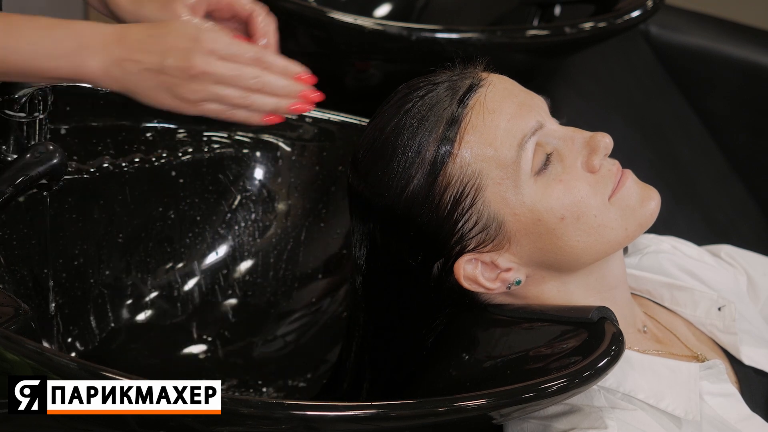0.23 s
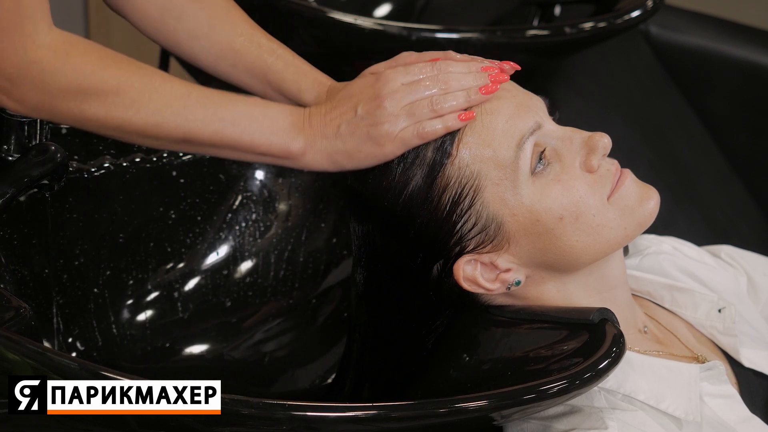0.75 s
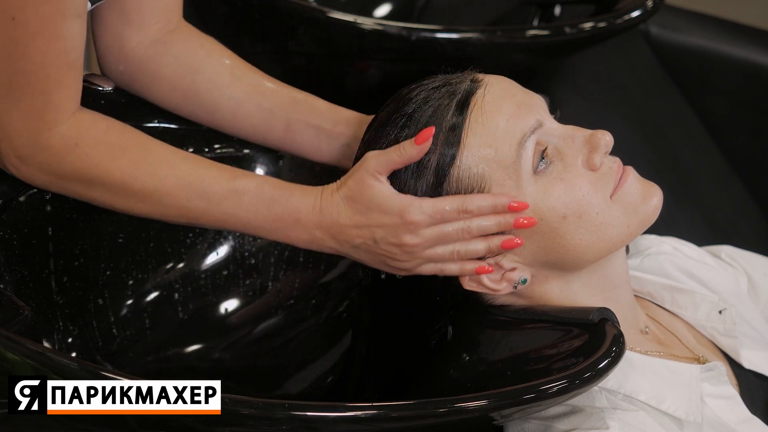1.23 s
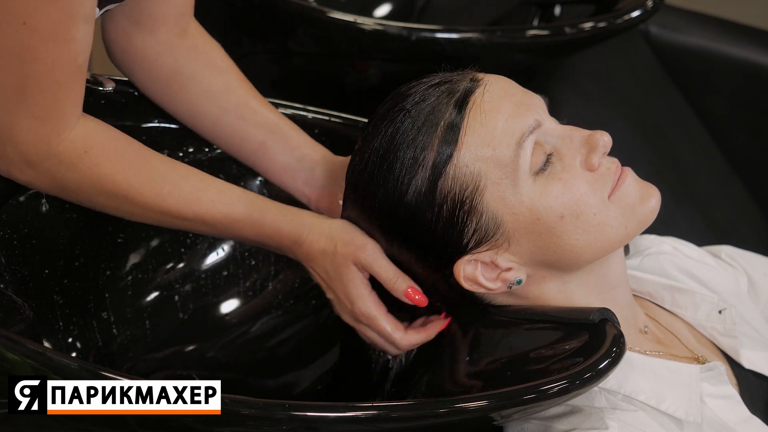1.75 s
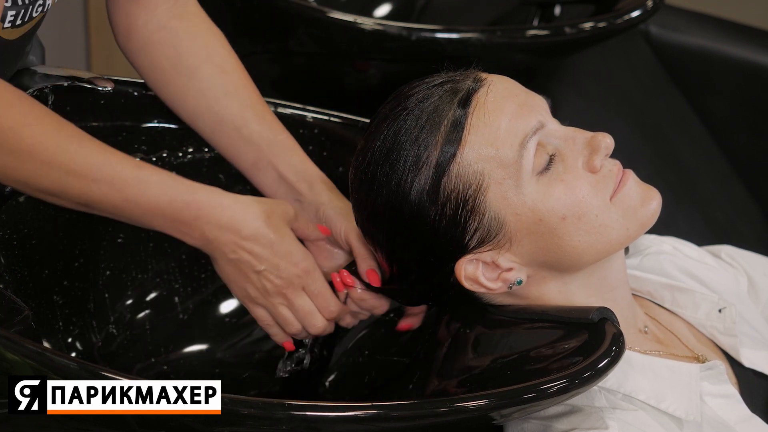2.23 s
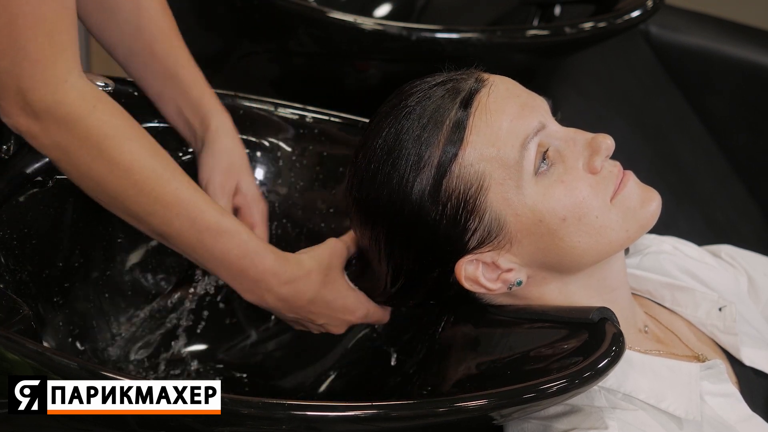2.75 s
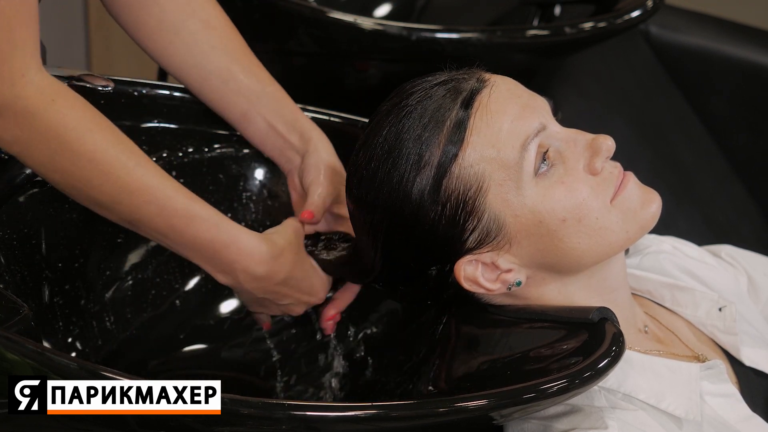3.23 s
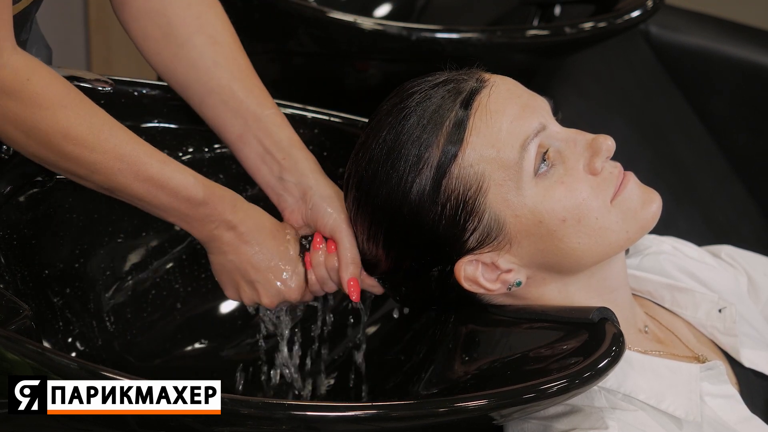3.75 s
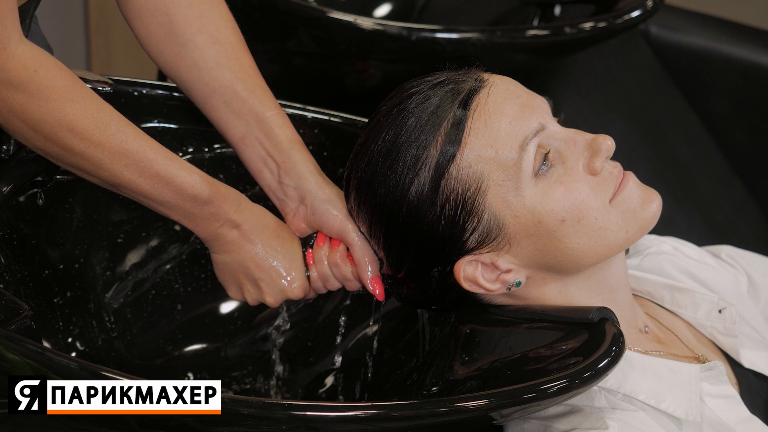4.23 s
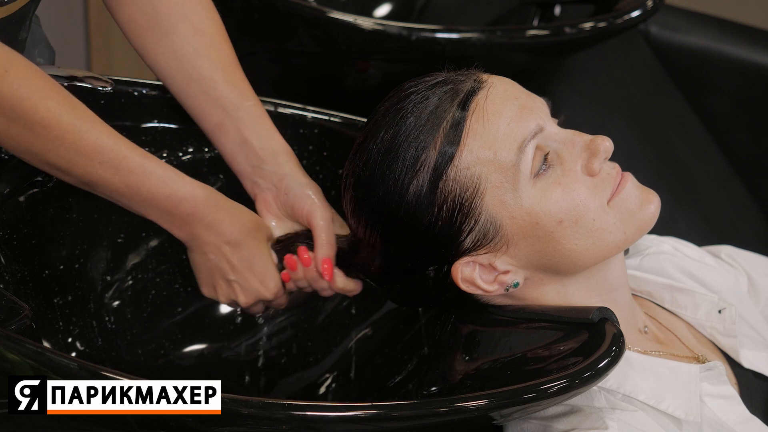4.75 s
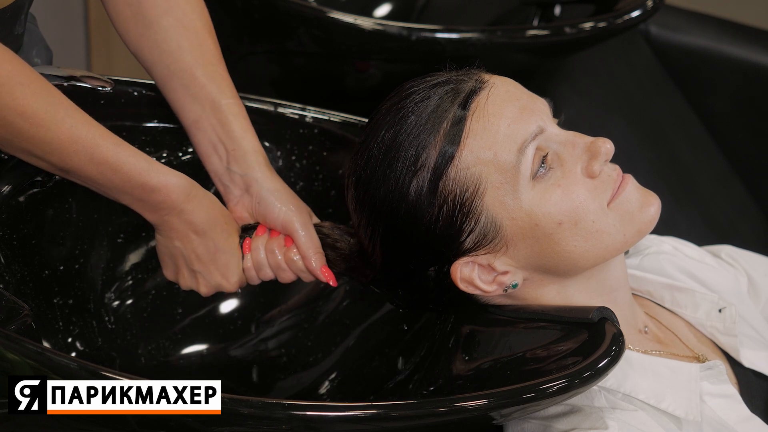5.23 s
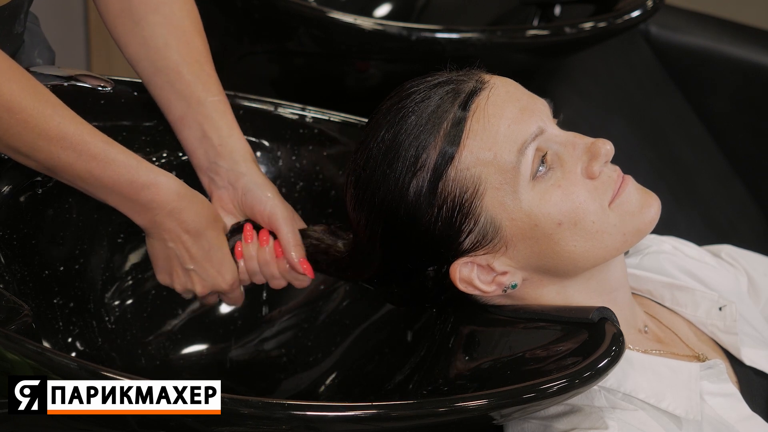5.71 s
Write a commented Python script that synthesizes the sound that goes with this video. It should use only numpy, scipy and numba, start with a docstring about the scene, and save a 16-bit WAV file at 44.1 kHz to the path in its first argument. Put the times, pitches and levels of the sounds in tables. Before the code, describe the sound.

Close-up water splashes fade fast to sparse drips, then hollow drain gurgles and bright droplets come in bursts as hands squeeze wet hair.

```python
"""At a ceramic basin, hands smooth and wring wet hair just after the sprayer is shut off.
The last spray drains away as fizzing, sloshing noise; drops crackle on the glaze as short gliding tones
with puffs of noise. Slugs of water glug in the drain pipe as dying low tones, drips ring the drain cup
and a trickle murmurs as resonant noise. Fingers rustle on the hair; a quiet room hums behind it all.
One close microphone hears it."""
import sys
import numpy as np
from scipy import signal
from scipy.fft import rfft, irfft, next_fast_len
from scipy.io import wavfile
from scipy.ndimage import uniform_filter1d
from numba import njit

SR = 44100
rng = np.random.default_rng(int(sys.argv[2]) if len(sys.argv) > 2 else 0)


def magnitude_from_level(level_db):
    """Linear magnitude for a level in decibels (20 dB per decade)."""
    exponent = np.asarray(level_db, float) / 20
    return 10 ** exponent


def put_to_file(sound):
    """Save the sound as 16-bit audio at rate SR, in the file named by the first command-line argument."""
    columns = np.atleast_2d(sound).T  # one column per channel
    safe = np.clip(columns, -1, 1)
    whole_steps = np.round(safe * 32767)
    wavfile.write(sys.argv[1], SR, whole_steps.astype(np.int16))


N = 263715  # length in samples, about 6 s

# Water running off hair and hands.
# Each row: time in seconds, fizz level in dB, level of the small drops in dB.
RUNNING_WATER = [(0.0, -38, -54), (0.18, -44.5, -45), (0.3, -59.5, -56), (0.61, -52, -59.5),
                 (0.77, -54, -59.5), (0.87, -61, -71), (1.27, -57, -61), (1.75, -60, -61.5),
                 (1.88, -52, -58), (2.18, -58, -67), (2.48, -54, -57), (2.8, -60.5, -57),
                 (2.98, -57, -52.5), (3.12, -61.5, -59), (3.25, -58.5, -61.5), (3.75, -62, -59),
                 (4.13, -66, -48.5), (4.3, -61.5, -54), (4.6, -69, -69.5), (4.81, -56, -53),
                 (5.06, -63.5, -69), (5.55, -67.5, -78), (5.98, -65, -68)]
# Slugs of water landing in the drain.
# Each row: start in seconds, level in dB, pitch of the air column in Hz before its glide,
# overtone level in dB against the column, time in seconds for the column to die by 60 dB.
SLUGS = [(1.263, -32.5, 235, -12, 0.025), (1.488, -35.5, 316, -8, 0.038), (1.523, -38, 363, -20, 0.041),
         (1.69, -40, 462, -17, 0.074), (1.922, -27, 383, -2, 0.014), (1.958, -29.5, 376, -5, 0.02),
         (2.025, -35, 352, -10, 0.027), (2.173, -34, 323, -1, 0.039), (2.283, -31.5, 278, -17, 0.024),
         (2.36, -26, 320, 0.5, 0.015), (2.38, -23.5, 305, -3, 0.032), (2.397, -16, 330, -22, 0.024),
         (2.423, -21.5, 328, -5, 0.044), (2.441, -14, 260, -17, 0.018), (2.454, -28, 318, -5, 0.026),
         (2.471, -34.5, 337, -5, 0.066), (2.534, -28, 326, -8, 0.038), (2.573, -37, 342, -12, 0.035),
         (2.672, -17, 287, -3, 0.028), (2.685, -7.5, 280.6, -15, 0.027), (2.698, -13, 268, -11, 0.02),
         (2.714, -22, 246, -10, 0.033), (2.78, -36.5, 256, -22, 0.069), (2.875, -23, 240, -8, 0.035),
         (2.893, -21.5, 253, -14, 0.047), (2.914, -14, 275.6, -13.5, 0.049), (2.942, -23, 259, -13, 0.022),
         (3.017, -33.5, 240, -16, 0.052), (3.053, -34, 226, -16, 0.03), (3.164, -35, 243, 2, 0.057),
         (3.201, -20, 239, -17, 0.04), (3.359, -30, 250, -24, 0.023), (3.547, -24.5, 280, -9.5, 0.02),
         (3.758, -23, 257, -4, 0.04), (3.781, -19.5, 300, -20, 0.019), (3.795, -25, 250, -3, 0.032),
         (3.807, -15, 228, -15, 0.038), (3.825, -16, 240, -16, 0.04), (3.846, -22, 256, -20, 0.098),
         (3.865, -21.5, 235, -13, 0.062), (3.905, -16.5, 250, -7.5, 0.022), (3.925, -21, 264, -4.5, 0.032),
         (3.939, -32, 243, -19, 0.036), (3.965, -22, 273.5, -18, 0.057), (4.045, -32, 250, -9, 0.036),
         (4.06, -23.5, 282, -6, 0.036), (4.091, -19.5, 245, -8, 0.015), (4.105, -4.5, 269, -7, 0.021),
         (4.127, -27, 270, -18, 0.02), (4.158, -30.5, 236, -3.5, 0.065), (4.201, -23.5, 283, -4.5, 0.045),
         (4.239, -18, 220, -6, 0.021), (4.249, -25, 225, -12, 0.046), (4.316, -25.5, 255, -0.5, 0.037),
         (4.361, -27.5, 228, -15, 0.051), (4.402, -37.5, 270, 1, 0.038), (4.426, -22.5, 293, -19, 0.016),
         (4.444, -35.5, 250, -5, 0.063), (4.754, -35.5, 293, -14, 0.025), (4.865, -32, 317, -9, 0.074)]
CUP_HZ = 1380  # pitch around which the drain cup rings


def level(x, db):
    """Scale a sound to an rms level in dB."""
    return x * magnitude_from_level(db) / np.sqrt(np.mean(x ** 2))


def curves(table):
    """Turn a table's columns into smooth curves over time, joined by straight lines."""
    s, *columns = np.transpose(table)
    return [np.interp(np.arange(N) / SR, s, column) for column in columns]


def colour(x, points):
    """Shape the spectrum by (Hz, dB) points joined on a logarithmic pitch axis."""
    hz, db = np.transpose(points)
    size = next_fast_len(len(x))
    f = np.maximum(np.arange(size // 2 + 1) * SR / size, 1)
    gain = magnitude_from_level(np.interp(np.log(f), np.log(hz), db))
    return irfft(rfft(x, size) * gain, size)[:len(x)]


def resonate(x, hz, width_hz):
    """Ring one resonance, with gain 1 at its centre."""
    return signal.lfilter(*signal.iirpeak(hz, hz / width_hz, fs=SR), x)


def walk(rate):
    """Wander randomly: levels held for 1 / rate seconds, then smoothed twice; spread near 1."""
    hold = int(SR / rate)
    steps = np.repeat(rng.standard_normal(N // hold + 1), hold)
    return 1.3 * uniform_filter1d(uniform_filter1d(steps, hold), hold)[:N]


@njit
def rings(count, start, size, hz, t60, glide, hook, rise, hold):
    """Add dying tones with a soft onset; the hook bends the pitch at once, the glide over t60.
    A hold of 1 decays evenly, 2 rings on and then stops quickly."""
    out = np.zeros(count)
    for k in range(len(start)):
        first = max(int((start[k] - rise) * SR), 0)
        phase = 0.
        for i in range(min(int(t60[k] * SR), count - first)):
            u = i / (t60[k] * SR)
            late = np.exp(-i / (rise * SR))
            pitch = min(hz[k] * (1 + glide * u + hook * late), .45 * SR)
            phase += 2 * np.pi * pitch / SR
            out[first + i] += size[k] * (1 - late) ** 2 * 1000. ** -(u ** hold) * np.sin(phase)
    return out


def bursts(s, size, t60_s, rise_s):
    """Make puffs of noise that swell briefly, then die by 60 dB in t60_s."""
    spikes = np.zeros(N)
    np.add.at(spikes, (s * SR).astype(int), size)
    fall = signal.lfilter([1], [1, -1000. ** (-1 / (t60_s * SR))], spikes)
    soft = np.exp(-1 / (rise_s * SR))
    return signal.lfilter([1 - soft], [1, -soft], fall) * rng.standard_normal(N)


def fizz(fizz_db):
    """Fine fizz of running water: noise bands that flicker partly together, partly each alone."""
    # Each row: frequency in Hz, gain in dB.
    fizz_shape = [(1200, -28), (2000, 3), (2600, 4.5), (3800, 4.5), (5500, 6), (7500, 5.5), (11000, 6),
                  (16000, 3.5)]
    shared = 1.5 * walk(25)
    bands = 0
    for hz in (2500., 4000., 6400., 10000., 15000.):
        flicker = magnitude_from_level(shared + 2 * walk(40))
        bands = bands + flicker * resonate(rng.standard_normal(N), hz, hz / 2)
    return magnitude_from_level(fizz_db) * level(colour(bands, fizz_shape), 0)


def slosh():
    """Duller wash of water: the last spray sags and stops, then the film on the glaze thins slowly."""
    # Each row: frequency in Hz, gain in dB.
    slosh_shape = [(150, 4), (300, 9.5), (600, 7), (1000, 5.5), (1800, 6), (2200, 2), (2650, 2.5),
                   (3200, 0), (4500, -5.5)]
    spray_start_db, spray_sag_db_per_s = -38.5, 47.5
    spray_stops_s, spray_stop_db_per_s = 0.2, 90
    film_start_db, film_fall_db_per_s = -56.5, 3
    now = np.arange(N) / SR
    after_stop = np.maximum(now - spray_stops_s, 0)
    spray_db = spray_start_db - spray_sag_db_per_s * now - spray_stop_db_per_s * after_stop
    slosh_db = np.maximum(spray_db, film_start_db - film_fall_db_per_s * now)
    noise = colour(rng.standard_normal(N), slosh_shape + [(8000, -56)])
    return magnitude_from_level(slosh_db) * level(magnitude_from_level(0.55 * walk(29.8)) * noise, 0)


def patter(small_db):
    """Shower of small, mostly faint drops: each a rising bubble tone and a click near its own pitch."""
    chance = rng.random((3000, 4))
    s = chance[:, 0] * (N - 1) / SR
    size = magnitude_from_level(np.minimum(-4 * np.log(chance[:, 1]), 17))
    hz = 2200 + 12800 * chance[:, 2]
    size = size * hz / hz.max()  # the low ones are fainter
    bubble = rings(N, s, size, hz, (15 + 60 * chance[:, 3]) / hz, 0.35, 0., .0002, 0.74)
    click = rings(N, s, size, 1.37 * hz, 9 / hz, -0.12, 0., .0001, 0.8)
    return magnitude_from_level(small_db) * level(bubble + click, 0)


def murmur():
    """Trickle in the drain: many small puffs of noise stir the pipe's resonances and the cup."""
    # Each row: time in seconds, murmur level in dB before it wavers.
    murmur_table = [(0.0, -43.5), (0.27, -58), (0.8, -57.5), (1.2, -62.5), (1.63, -54), (1.91, -48),
                    (2.21, -52), (2.46, -39), (2.55, -47.5), (2.68, -45), (3.0, -51), (3.76, -53.5),
                    (3.85, -55), (3.98, -58), (4.14, -50.5), (4.58, -55), (4.83, -45.5), (5.06, -55),
                    (5.6, -67), (5.98, -54.5)]
    # Resonances of the drain. Each row: pitch in Hz, width in Hz, gain in dB.
    pipe_resonances = [(250, 38, 6.5), (337.5, 32, 4.5), (400, 81, -3.5), (490, 240, -7), (600, 33, -7.5)]
    cup_width_hz, cup_under_pipe_db = 100, -20
    murmur_db = curves(murmur_table)[0] + 1.3 * walk(13)
    sizes = 1 + rng.exponential(size=1800)
    trickle = bursts(rng.random(1800) * (N - 1) / SR, sizes, .03, .003)
    pipe = 0
    for hz, width, db in pipe_resonances:
        pipe = pipe + magnitude_from_level(db) * resonate(resonate(trickle, hz, 2 * width), hz, width)
    steady = 0.43 * np.std(trickle) * rng.standard_normal(N)
    cup = resonate(resonate(trickle + steady, CUP_HZ, 2 * cup_width_hz), CUP_HZ, cup_width_hz)
    return magnitude_from_level(murmur_db) * (level(pipe, 0) + level(cup, cup_under_pipe_db))


def room():
    """Quiet room: shaped air noise, wavering motor hum made of narrow noise, and a thin whine."""
    # Air noise. Each row: frequency in Hz, gain in dB.
    air_shape = [(12, -46), (20, 3.5), (60, -11.5), (146, -2), (222, -2.5), (293, -19), (485, -11),
                 (624, -18.5), (678, -20.5), (780, -22), (1610, -35), (11800, -74), (16000, -50)]
    # Motor hum. Each row: pitch in Hz, rms level in dB, width in Hz.
    hum_lines = [(67.8, -73, 4.7), (146.4, -65.5, 2.7), (206.3, -60, 2.8), (244, -66.5, 2.4),
                 (472.4, -66.5, 3.6)]
    air_db, whine_hz, whine_db = -53, 686, -65
    air = level(colour(rng.standard_normal(N), air_shape), air_db)
    hum = 0
    for hz, db, width in hum_lines:
        hum = hum + level(resonate(rng.standard_normal(N), hz, width), db)
    # the whine wavers in loudness and a little in pitch
    whine_phase = 2 * np.pi * np.cumsum(whine_hz + 1.365 * walk(8)) / SR
    whine = magnitude_from_level(2.3 * walk(2.18)) * np.sin(whine_phase)
    return air + hum + level(whine, whine_db)


def rumble():
    """Low rumble of shaped noise that comes and goes, likely arms and neck leaning on the basin."""
    # Each row: time in seconds, rumble level in dB before it wavers.
    rumble_table = [(0.0, -45.5), (0.27, -56.5), (2.2, -59.5), (2.55, -56.5), (3.14, -65), (3.25, -42),
                    (3.46, -51), (3.6, -47), (3.68, -58), (3.78, -46.5), (4.2, -57), (4.58, -53.5),
                    (4.83, -48.5), (5.06, -60), (5.35, -50.5), (5.56, -59), (5.67, -47.5), (5.8, -52),
                    (5.98, -45.5)]
    rumble_db = curves(rumble_table)[0] + 1.6 * walk(8)
    shape = [(15, -41), (33, -14), (60, 6), (110, -0.5), (170, -1.0), (400, -70)]
    return magnitude_from_level(rumble_db) * level(colour(rng.standard_normal(N), shape), 0)


def splashes(s, hz, splash_db):
    """Splash noise in bands, strongest near the bubble's pitch and fading away from it."""
    # Centres of the noise bands in Hz.
    splash_bands = (2500., 4000., 6400., 10000., 14500.)
    up_db_per_octave, down_db_per_octave = 6.5, 12.5
    splash = 0
    for band in splash_bands:
        octaves = np.log2(band / hz)
        fade_db = np.maximum(up_db_per_octave * octaves, -down_db_per_octave * octaves)
        puffs = bursts(s - .0005, magnitude_from_level(splash_db - fade_db), 0.01, 0.00083)
        splash = splash + resonate(resonate(puffs, band, 0.76 * band), band, 0.76 * band)
    return colour(splash, [(1200, 2.0), (2500, -5.5), (6000, -7), (15000, -5.0)])


def drops():
    """Drops on the glaze, some with two bubbles at once: bubbles rising in pitch, with splashes."""
    # Each row is one bubble: start in seconds, bubble level in dB, bubble pitch in Hz before it rises,
    # splash level in dB against the bubble.
    bubble_table = [(0.0078, -12, 6100, 1.5), (0.0225, -27, 2670, -3), (0.0367, -24, 5660, 2),
                    (0.0427, -19, 5800, 4.5), (0.053, -17, 13400, 3), (0.0826, -21.5, 5550, -13),
                    (0.0984, -10.5, 11100, -11), (0.1095, -25.5, 2500, -6), (0.138, -19, 10700, -4),
                    (0.152, -23, 9800, -5), (0.1732, -30.5, 2410, -5), (0.175, -24, 9130, -16),
                    (0.19, -23, 10850, -2), (0.1906, -27, 3930, -4), (0.2453, -34, 7560, -2),
                    (0.2852, -28, 12500, 1), (0.2866, -28, 4840, 0.5), (0.335, -28, 11000, 1),
                    (0.336, -27.5, 4140, 3), (0.347, -24, 12750, -5), (0.362, -25, 8750, -7),
                    (0.371, -19, 10500, -8), (0.489, -37, 6250, -4), (0.519, -37, 4550, 5.5),
                    (0.5364, -40, 2440, -2), (0.6458, -16, 14000, -5), (0.6457, -27, 5260, 2.5),
                    (0.9313, -40.5, 3170, -8), (1.364, -34, 4500, -9), (1.3951, -26, 6140, -17),
                    (1.4166, -35, 5000, 4), (1.451, -33.5, 4730, 1), (1.5037, -30.5, 9100, -4),
                    (1.529, -30, 9550, -5), (1.693, -26, 11600, -18), (1.7437, -21, 12000, -14),
                    (1.777, -26, 12100, -0.5), (1.8255, -25.5, 12200, -2), (1.909, -33, 5470, 8),
                    (1.946, -34, 6800, 5), (2.145, -24, 5000, -3.5), (2.17, -37, 4280, -4),
                    (2.2795, -37.5, 5080, 6), (2.3285, -30, 6300, -17), (2.3686, -35, 10510, 3),
                    (2.4413, -22, 5700, -1), (2.442, -24, 13780, 0), (2.5354, -26.5, 9200, -8),
                    (2.6236, -28.5, 12100, 4), (2.7112, -28, 9350, -11), (2.7567, -32, 4160, -10),
                    (2.7674, -37, 5600, 1), (2.8153, -28.5, 10500, 5), (2.893, -9.5, 10000, -20),
                    (2.8932, -21, 7050, -2.5), (2.9193, -20, 12000, -4), (2.9448, -26.5, 14400, 3.5),
                    (2.963, -24, 11710, -9), (2.987, -30, 7240, -1), (3.0126, -27.5, 4850, 0.5),
                    (3.02, -20, 10900, -6), (3.0491, -23, 5170, -7), (3.083, -31, 5680, -4),
                    (3.0958, -34.5, 8200, 2), (3.174, -17, 5600, -10.5), (3.1861, -28, 11400, 3),
                    (3.2403, -25, 11200, -5), (3.2447, -25.5, 5070, -2.5), (3.286, -35, 5300, -2),
                    (3.366, -31, 5570, -3), (3.4268, -31, 6140, -2), (3.4687, -33, 7800, 4),
                    (3.4821, -26, 4540, -2), (3.618, -28, 7300, -17), (3.6382, -32, 11200, 5),
                    (3.647, -17, 5770, -15), (3.6463, -22, 9470, -5), (3.68, -28, 10300, -7),
                    (3.681, -28, 3730, 5), (3.715, -32, 3940, -15), (3.727, -21.5, 7700, -21),
                    (3.759, -26, 9650, -7), (3.775, -26.5, 10400, 7.5), (3.799, -31, 9900, 2),
                    (3.8175, -21, 12000, -1), (3.8472, -28.5, 13950, 0.5), (3.8858, -36.5, 4500, 6.5),
                    (3.9076, -22.5, 9730, -3), (3.9205, -31.5, 6030, 0.5), (3.9437, -27, 13600, 3),
                    (3.9594, -23, 4820, -17), (3.959, -22, 8160, 2.5), (3.9833, -22, 8240, -5),
                    (4.005, -23, 7600, -8), (4.0214, -22, 8900, 5.5), (4.0232, -15, 4960, -23),
                    (4.041, -15, 11000, -7), (4.0536, -37, 3240, -9), (4.066, -23, 7700, -11),
                    (4.0711, -33, 4030, -5), (4.0825, -29, 4020, -6), (4.0935, -15, 12300, -7),
                    (4.102, -22, 7650, -7), (4.1275, -28.5, 3000, -17), (4.133, -15.5, 9300, -7.5),
                    (4.144, -17.5, 5500, -1.5), (4.144, -22.5, 9300, -3), (4.1667, -18, 5100, -22),
                    (4.1664, -18.5, 9800, 0.5), (4.208, -23.5, 8350, 6), (4.2274, -37.5, 4150, 3),
                    (4.241, -23, 7500, 3.5), (4.256, -27, 6660, 4), (4.267, -26, 8900, 3),
                    (4.2873, -30, 8610, -3), (4.31, -27, 4600, -4), (4.319, -28.5, 8800, 5),
                    (4.3654, -36, 11400, -3), (4.4004, -27.5, 12600, -3), (4.426, -39.5, 6300, 4.5),
                    (4.4741, -30, 12750, -1), (4.4928, -29.5, 13300, 0), (4.532, -27, 11400, -9),
                    (4.556, -22, 10860, -5.5), (4.5847, -35, 7000, -1), (4.6143, -24, 11200, -8),
                    (4.7828, -28.5, 6460, 1.5), (4.8433, -30, 8950, -4), (4.968, -18, 8000, -3),
                    (4.9895, -33, 3530, -10), (5.3681, -37, 9600, 6.5), (5.3882, -31, 12300, 0)]
    s, db, hz, splash_db = np.transpose(bubble_table)
    bubble = rings(N, s, magnitude_from_level(db), hz, 45 / hz + 0.0025, 0.31, 0., .0002, 0.64)
    # three more bubbles for each row, from 2 ms before its start to 5 ms after
    chance = rng.random((len(s), 3, 3))
    more_s = (s[:, None] + 0.007 * chance[..., 0] - .002).ravel()
    more_hz = (hz[:, None] * 2.0 ** (1.555 * chance[..., 1] - .35)).ravel()
    more_size = magnitude_from_level((db + splash_db)[:, None] - 4.3 * chance[..., 2]).ravel()
    spray = rings(N, more_s, more_size, more_hz, 40 / more_hz, 0.99, 0., .00015, 0.8)
    return bubble + spray + splashes(s, hz, db + splash_db)


def cup_rings():
    """Drips and landing slugs ring the drain cup: dying tones that sink, each begun by a short tap."""
    # Drips. Each row: start in seconds, level in dB, pitch in Hz before its glide,
    # time in seconds to die by 60 dB.
    drip_table = [(0.297, -40.5, 2290, 0.016), (0.368, -35.5, 1630, 0.025), (0.371, -33, 2730, 0.014),
                  (0.4179, -37.5, 2110, 0.016), (0.487, -35.5, 1680, 0.014), (0.762, -40, 1880, 0.018),
                  (1.416, -41, 1100, 0.028), (1.432, -36, 1430, 0.016), (1.4486, -35, 1360, 0.013),
                  (1.4773, -39, 1700, 0.019), (1.5815, -42.5, 1430, 0.019), (2.17, -48.5, 1480, 0.05),
                  (2.475, -42.5, 1430, 0.074), (2.8474, -42.5, 1990, 0.019), (2.9144, -40.5, 1360, 0.069),
                  (3.254, -39, 2070, 0.019), (3.3325, -48.5, 1374, 0.08), (3.55, -48, 1640, 0.03),
                  (3.572, -50, 1370, 0.031), (3.6501, -43, 1320, 0.018), (3.775, -41, 2060, 0.014),
                  (3.8723, -43.5, 1430, 0.033), (3.914, -50, 1386, 0.045), (4.0595, -41.5, 1240, 0.013),
                  (4.1121, -41, 1447, 0.056), (4.235, -53, 1420, 0.06), (4.262, -50, 2250, 0.025),
                  (4.5416, -33.5, 1373, 0.051)]
    kick_db, kick_t60_s = -34, 0.039  # the cup's ring from a slug, against the slug's level
    s, db = np.transpose(SLUGS)[:2]
    kick_hz = CUP_HZ * (1.03 + .03 * rng.standard_normal(len(s)))
    kicks = np.c_[s, db + kick_db, kick_hz, np.full(len(s), kick_t60_s)]
    s, db, hz, t60 = np.r_[drip_table, kicks].T.copy()
    ring = rings(N, s, magnitude_from_level(db), hz, t60, -.08, .14, .001, 1.3)
    tap = rings(N, s, magnitude_from_level(db - 4), 1.08 * hz, 7 / hz, -.3, .3, 0.00019, 0.95)
    return ring + tap


def glugs():
    """Slugs of water ring the pipe's air column and its overtone, the pitch dropping as they land."""
    s, db, hz, over_db, t60 = np.transpose(SLUGS)
    sign = np.sign(rng.standard_normal(len(s)))  # the first push goes either way
    column = rings(N, s, sign * magnitude_from_level(db), hz, t60, -0.17, 0.64, 0.0019, 1.7)
    over_size = sign * magnitude_from_level(db + over_db)
    overtone = rings(N, s, over_size, 1.985 * hz, 0.49 * t60, -0.0083, 0.05, 0.0013, 1.83)
    return column + overtone


def strokes():
    """Fingers sliding on wet hair: short grainy rustles, each a rounded swell of tiny crackles."""
    # Each row: start in seconds, level in dB at the top of the swell, length in seconds.
    stroke_table = [(1.4, -54, 0.12), (1.772, -47.5, 0.059), (1.924, -41.5, 0.049), (4.75, -69, 0.078),
                    (5.304, -61.5, 0.12), (5.4, -61.5, 0.066), (5.625, -71, 0.033), (5.763, -52.5, 0.1),
                    (5.839, -56, 0.077)]
    t = np.arange(N) / SR
    swell = 0
    for s, db, length in stroke_table:
        swell = swell + magnitude_from_level(db) * np.sin(np.pi * np.clip((t - s) / length, 0, 1)) ** 2
    crackle = magnitude_from_level(4.0 * walk(150)) * rng.standard_normal(N)
    shape = [(800, -1), (2500, -2.5), (5000, -2.5), (9000, 0), (15000, -5)]
    return swell * level(colour(crackle, shape), 0)


def bowl_echo(near):
    """Short ring of the bowl: the sound smeared by a dying noise tail that starts after 1 ms."""
    bowl_t60_s, bowl_db = 0.18, -11
    t = np.arange(SR // 5) / SR
    tail = rng.standard_normal(len(t)) * 1000. ** (-t / bowl_t60_s) * (t > .001)
    return signal.fftconvolve(near, tail * magnitude_from_level(bowl_db) / np.sqrt(np.sum(tail ** 2)))[:N]


def scene():
    """Mix the water and rustles with the ring of the bowl, the wash and the room."""
    fizz_db, small_db = curves(RUNNING_WATER)
    wash = fizz(fizz_db) + slosh()
    background = room() + rumble()
    near = patter(small_db) + murmur() + drops() + cup_rings() + glugs() + strokes()
    return (near + bowl_echo(near) + wash + background)[None]


def low_pass(x):
    """Removes everything above the highest recorded frequency."""
    return signal.sosfilt(signal.butter(12, 17010, fs=SR, output="sos"), x)


def record(dry):
    """The microphone loses the deepest bass, and the top is cut steeply."""
    top_hz = 15750
    lean = signal.sosfilt(signal.butter(4, 40., "high", fs=SR, output="sos"), dry)
    cut = signal.sosfilt(signal.ellip(10, .2, 60, top_hz, fs=SR, output="sos"), lean)
    return low_pass(cut)


dry = scene()
out = record(dry)
put_to_file(out)
```